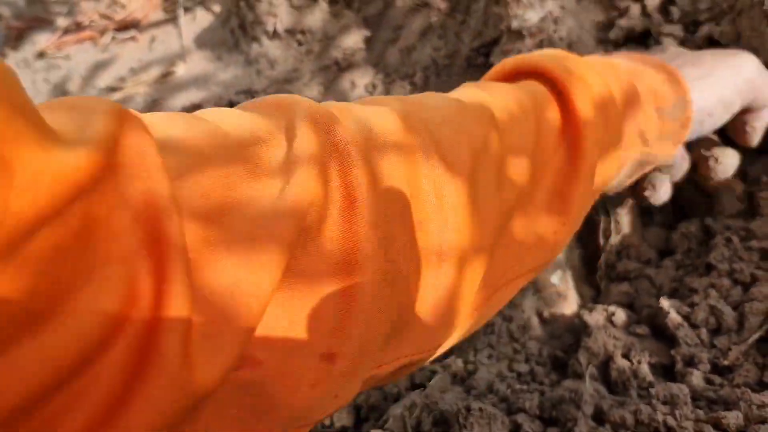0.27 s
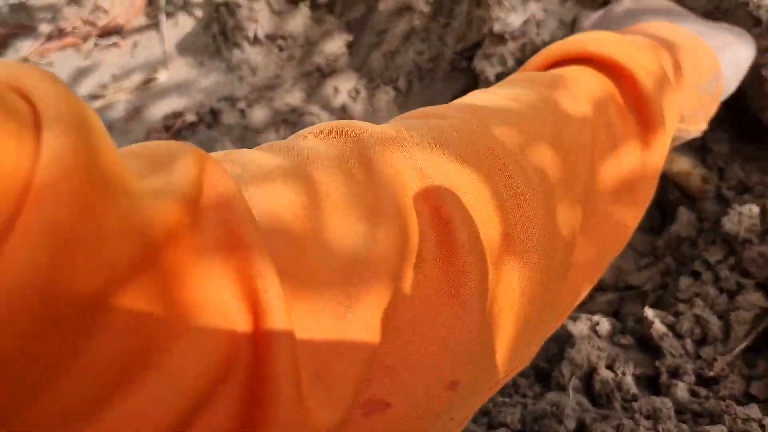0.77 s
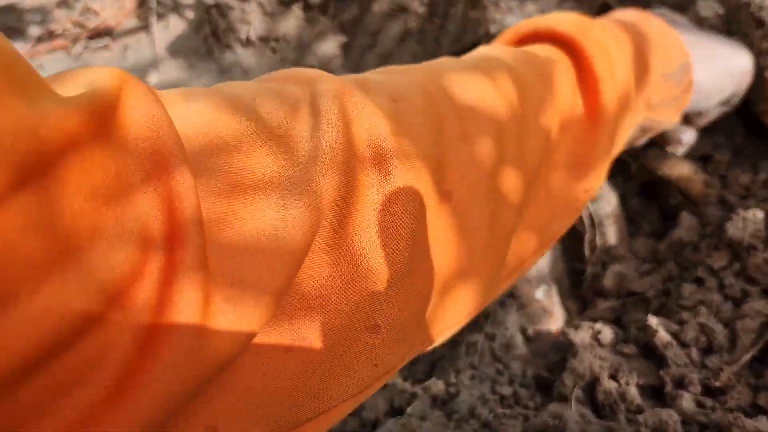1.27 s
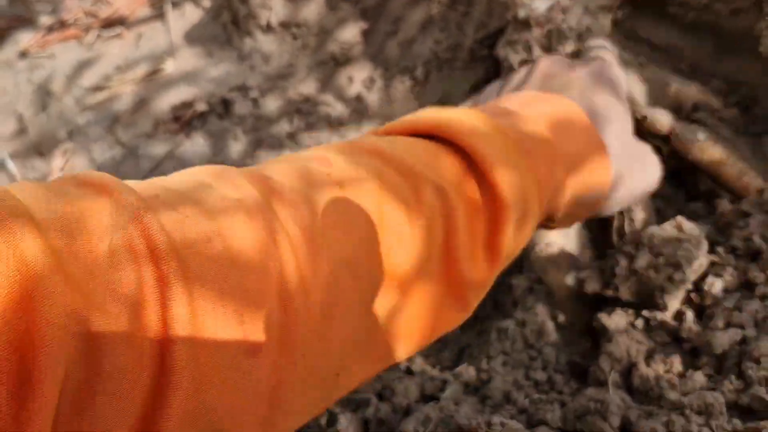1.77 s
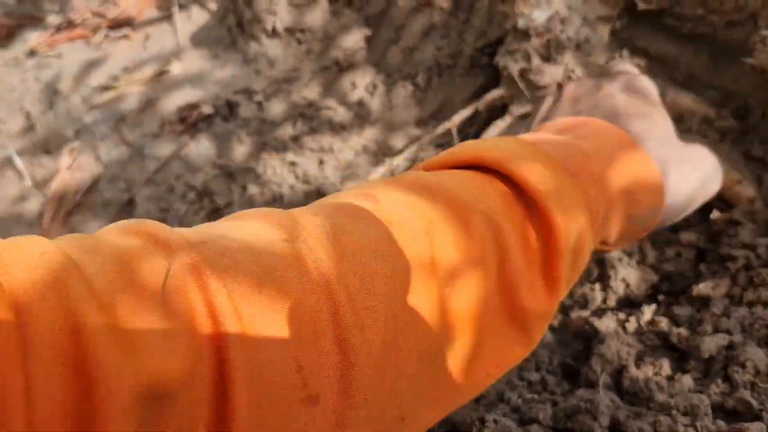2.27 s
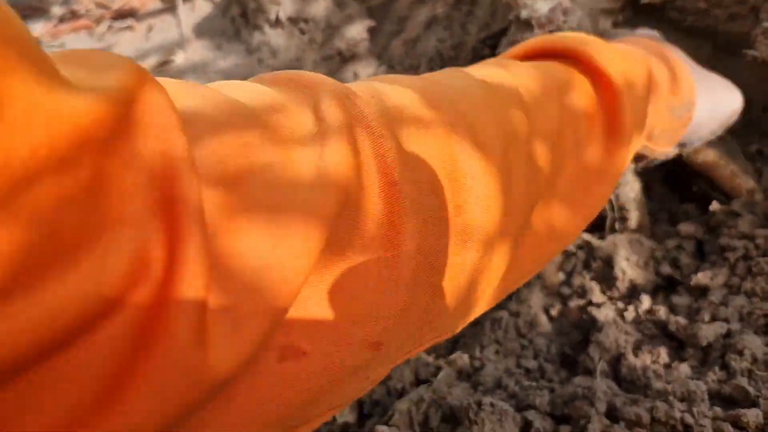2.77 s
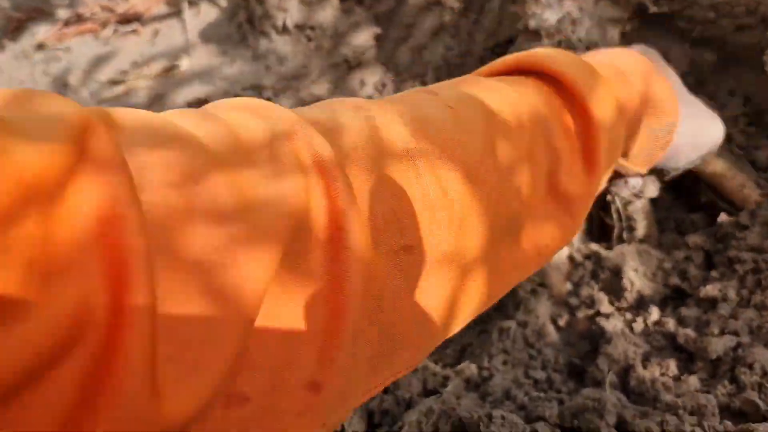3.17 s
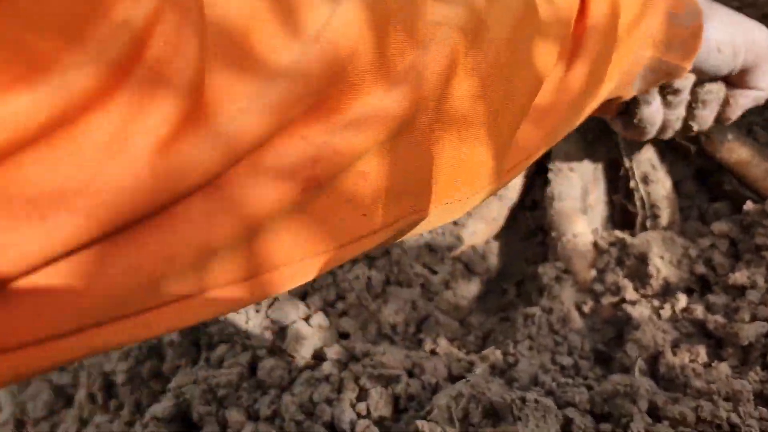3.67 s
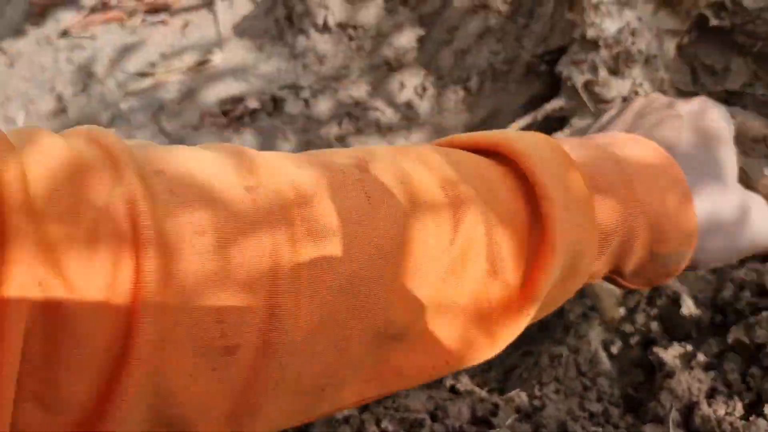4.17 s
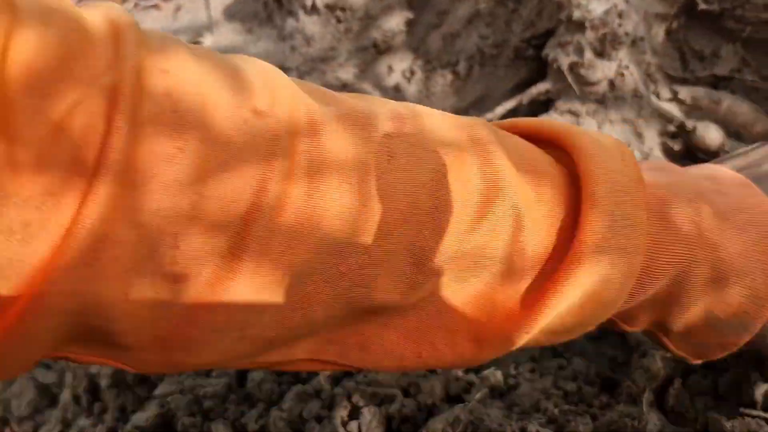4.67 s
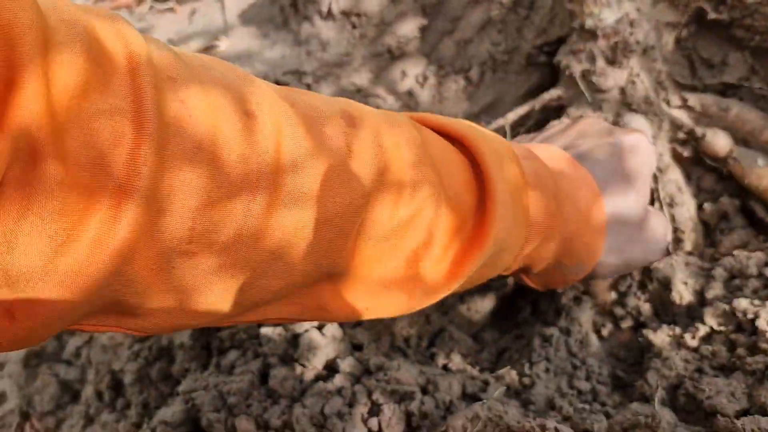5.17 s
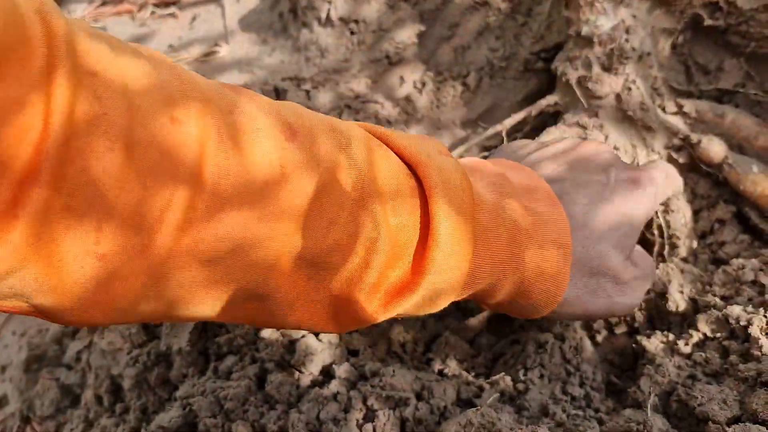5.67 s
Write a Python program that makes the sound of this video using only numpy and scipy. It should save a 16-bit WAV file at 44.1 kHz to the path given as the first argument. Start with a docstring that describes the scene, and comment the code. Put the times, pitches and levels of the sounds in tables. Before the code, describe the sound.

Irregular dry scratching and crumbling of earth close by, dotted with tiny clicks, above a low wavering motor hum across a field.

```python
"""A gloved hand scrapes crumbly soil from a plant base, right of a handheld phone: patchy noise and random grains
make grit and dust hiss, the sleeve swish, the glove drag and clods crumble, all following the hand's strokes.
Gliding narrow noise whistles in the rubbing; small stones and roots tick as short cracks over damped knocks.
Behind them a far engine drones across the field as three wavering tones, over a low rumble that swells
as the hand shoves earth, and a faint steady hiss."""
import sys
import numpy as np
from scipy import signal
from scipy.fft import rfft, irfft, next_fast_len
from scipy.io import wavfile
from scipy.ndimage import uniform_filter1d, map_coordinates

SR = 44100
rng = np.random.default_rng(int(sys.argv[2]) if len(sys.argv) > 2 else 0)


def digitize_waveform(pressure):
    """Quantize a signal to 16-bit integers and store it at the path in sys.argv[1].

    Rows of a 2-D input are taken as channels; values are limited to [-1, 1].
    """
    field = np.atleast_2d(pressure).T
    bounded = np.clip(field, -1, 1)
    quanta = np.round(bounded * 32767).astype(np.int16)
    wavfile.write(sys.argv[1], SR, quanta)


N = 260322


def amp(db):
    """Gain of a level in dB."""
    return 10 ** (np.asarray(db) / 20)


def unit(x):
    """Scaled to rms 1."""
    return x / np.sqrt(np.mean(x ** 2) + 1e-20)


def along(points, hz):
    """Value at each frequency, between (Hz, value) points on a log axis."""
    point_hz, values = np.transpose(points)
    return np.interp(np.log(hz + 1), np.log(point_hz + 1), values)


def curves(rows):
    """One value per sample for each column after the time."""
    time_s, *columns = np.transpose(sorted(map(tuple, rows)))
    return [np.interp(np.arange(N) / SR, time_s, column) for column in columns]


def wobble(rate):
    """A smooth random curve through normal draws, rate knots a second."""
    knots = rng.standard_normal(int(N * rate / SR) + 4)
    return map_coordinates(knots, [np.arange(N) * rate / SR])


def filtered(x, response):
    """x shaped by a complex response of frequency, padded so that little wraps round."""
    length = next_fast_len(x.shape[-1] + 8192)
    spectrum = rfft(x, length) * response(np.fft.rfftfreq(length, 1 / SR))
    return irfft(spectrum, length)[..., :N]


def ports(three, spectrum, alike, lag_s):
    """Stereo of rms 1: a shared part reaches the right port late by lag_s, two more belong to one port each."""
    # the phone's body shades the left port: hz, left_minus_right_db
    shadow = [(60, -5), (110, 4), (200, -4), (380, 3), (700, 0.5), (1290, 0), (2380, -4.0), (4400, -9.5),
              (8120, -4.5), (15000, -1.5)]
    side = np.array([[1], [-1]])  # left, right

    def share(hz):
        return np.clip(along(alike, hz), 0, 1)  # shared part of the power

    def colour(hz):
        return amp(along(spectrum, hz) + side * along(shadow, hz) / 2)

    def shared_response(hz):
        lag = np.exp(1j * np.pi * side * hz * lag_s)  # half the lag at either port
        return colour(hz) * np.sqrt(share(hz)) * lag

    both = filtered(three[[0, 0]], shared_response)
    own = filtered(three[1:], lambda hz: colour(hz) * np.sqrt(1 - share(hz)))
    return unit(both + own)


def patchy(depth_db):
    """Three noises that share one random gain over time and frequency, as nearby reflections add or cancel."""
    z = signal.stft(rng.standard_normal((3, N)), nperseg=256)[2]

    def smooth(bins, frames):
        across_hz = uniform_filter1d(rng.standard_normal(z.shape[1:]), bins, 0)
        return unit(uniform_filter1d(across_hz, frames, 1))

    patches = smooth(4, 12)
    lasting_bands = smooth(2, 70)  # narrow: where reflections add or cancel
    colour_shifts = smooth(10, 40)  # broad
    gain = amp(depth_db * (patches + 1.2 * lasting_bands + colour_shifts))
    return unit(signal.istft(z * gain, nperseg=256)[1][:, :N])


def crumbs(rate, spread_db):
    """Random breaking grains, rate a second on average, a few larger than the rest."""
    struck = rng.random(N) < rate / SR
    size = amp(spread_db * np.minimum(rng.exponential(size=N), 4))
    return unit(struck * size * rng.standard_normal((3, N)))


def shoves():
    """Gain of the low swells as the hand shoves earth, each a smooth rise and fall."""
    # swells: middle_s, length_s, peak_db
    swells = [(0.293, 0.086, -57), (0.404, 0.14, -57.5), (1.373, 0.3, -56), (2.104, 0.15, -56.5),
              (2.38, 0.05, -59), (2.5, .08, -57), (2.996, 0.32, -62), (4.29, 0.044, -51), (5.855, .12, -46)]
    t = np.arange(N) / SR
    gain = np.zeros(N)
    for middle_s, length_s, peak_db in swells:
        phase = np.pi * np.clip((t - middle_s) / length_s, -.5, .5)
        gain += amp(peak_db) * np.cos(phase) ** 2
    return gain


def field():
    """Wavering low rumble, nearly alike at both ports, its upper part with the shoves, and a faint steady hiss."""
    # low rumble: hz, relative_db_per_hz
    rumble_spectrum = [(15, -77), (25, -32), (32, -32), (40, -12.5), (52, 0), (62, -3), (78, -6.5),
                       (97, 0.5), (110, -7.5), (127, 4), (145, -18), (165, -7), (185, -12), (215, -11.5),
                       (260, -29), (330, -120)]
    # upper part of the rumble: hz, relative_db_per_hz
    upper_spectrum = [(170, -53), (215, -4.5), (260, -1), (320, -4), (370, -5), (430, -11), (520, -18.5),
                      (650, -41.5), (800, -49), (1100, -120)]
    # upper rumble without the shoves: time_s, level_db
    upper_level = [(0.0, -64.5), (0.43, -62), (0.61, -66.5), (3.37, -61.5), (3.75, -66), (4.26, -57),
                   (4.86, -63.5), (5.9, -64)]
    # steady hiss: hz, relative_db_per_hz
    hiss_spectrum = [(400, -20), (600, 0), (750, -12), (1300, -20), (3000, -26), (6700, -21), (8500, -27),
                     (15800, -27)]
    rumble = ports(rng.standard_normal((3, N)), rumble_spectrum, [(40, 0.96), (150, 1.0)], lag_s=0.00024)
    upper = ports(patchy(0.85), upper_spectrum, [(250, 0.87), (500, 0.86)], lag_s=0.000069)
    hiss = ports(patchy(0.78), hiss_spectrum, [(500, 0.24), (1500, 0.78), (5000, 0.18)], lag_s=.0001)
    rumble_gain = amp(-47.5 + 1.2 * wobble(4.7))
    upper_gain = np.hypot(amp(curves(upper_level)[0]), shoves())  # added in power
    return rumble_gain * rumble + upper_gain * upper + amp(-77) * hiss


def engine():
    """Firing orders one to three as sines; the path through the air makes the tones flutter in level and phase."""
    # third order: time_s, pitch_hz, rms_level_db (before flutter and stereo balance)
    third_order = [(0.0, 202.3, -46), (0.06, 199.8, -42.5), (0.85, 199.9, -56.5), (1.44, 199.9, -55.5),
                   (2.14, 200.0, -49.5), (2.19, 200.0, -57), (2.76, 199.8, -44), (3.5, 199.9, -47.5),
                   (3.84, 200.0, -41.5), (4.06, 200.0, -45), (4.09, 200.3, -41.5), (4.19, 201.5, -45.5),
                   (4.73, 201.3, -37.5), (5.01, 201.7, -38.5), (5.11, 202.5, -43), (5.9, 204.0, -46.5)]
    # first order, the lowest tone: time_s, rms_level_db (before flutter and stereo balance)
    first_order = [(0.0, -33), (0.05, -44.5), (0.38, -59), (0.49, -47), (1.18, -48), (1.25, -61),
                   (1.31, -52), (1.77, -48.5), (1.92, -61), (2.07, -40), (2.28, -70), (2.36, -46.5),
                   (3.12, -49.5), (3.24, -40), (3.32, -70), (3.4, -42), (3.68, -54), (3.75, -41),
                   (3.96, -62), (4.06, -45.5), (5.04, -46.5), (5.16, -56), (5.29, -44), (5.9, -55.5)]
    third_hz, third_db = curves(third_order)
    first_db, = curves(first_order)
    turn = 2 * np.pi * np.cumsum(third_hz / 3) / SR  # phase of the first order
    lead = np.array([[1], [-1]])  # left, right: offsets in phase (rad) and level (dB)
    first_gain = amp(first_db + 0.33 * wobble(12)) * amp(-.4 * lead)
    first = first_gain * np.sin(turn + .5 * wobble(6.1) + 0.052 * lead)
    second_gain = amp(-63.5 + 4.7 * wobble(5.4))
    second = second_gain * np.sin(2 * turn + 1.2 * wobble(7) + 0.18 * lead)
    third_gain = amp(third_db + .7 * wobble(12)) * amp(.7 * lead)
    third = third_gain * np.sin(3 * turn + .15 * wobble(9) + .15 * lead)
    return np.sqrt(2) * (first + second + third)  # sine peak from rms level


def ticks():
    """Stones and roots: each tick is a short bright crack over a damped low knock."""
    # ticks: start_s, crack_db and knock_db (before the lifts below), knock_hz, left_minus_right_db
    hits = [(0.2929, -42, -62, 700, -6), (0.6876, -44, -67, 939, -11), (0.7304, -44, -72, 1480, -8),
            (0.751, -63, -58, 900, -5), (0.8367, -46, -83, 674, -13), (2.0844, -46, -44, 840, -7),
            (2.1119, -52, -59, 710, -12), (2.2353, -68, -82, 665, -9.5), (2.264, -66, -80, 673, -10),
            (2.4793, -52, -62, 870, 9), (2.7789, -63, -61, 846, -9), (2.8194, -50.5, -66, 840, -7.0),
            (3.182, -70, -60, 715, -2), (3.8642, -42, -72, 800, -13), (4.4584, -57, -51.5, 740, -6),
            (4.971, -81, -70, 690, -7), (5.2965, -70, -61, 830, 3), (5.519, -68, -69, 700, 16),
            (5.773, -76, -64, 610, 8), (5.8167, -58, -46.5, 645, 4), (5.8476, -40, -44, 656, 4),
            (5.8874, -43, -60, 830, 13)]
    crack_lift_db, knock_lift_db = 4, 6.0
    out = np.zeros((2, N + SR))
    t = np.arange(SR // 40) / SR

    def bright(hz):
        highpass = 1j * hz / (900 + 1j * hz)
        return highpass / (1 + 1j * hz / 5500) ** 3

    for start_s, crack_db, knock_db, knock_hz, pan_db in hits:
        noise = rng.standard_normal((3, len(t)))
        noise[0, 0] = 5  # the first break is one sharp step
        crack = filtered(noise[0] + 0.3 * noise[1:], bright)[:, :len(t)]
        crack = amp(crack_db + crack_lift_db) * crack * amp(-60 * t / .006)  # falls 60 dB in 6 ms
        ring = np.sin(2 * np.pi * knock_hz * t)
        swell_and_decay = amp(-60 * t / 0.02) * (1 - np.exp(-t / 0.00084))
        knock = amp(knock_db + knock_lift_db) * ring * swell_and_decay
        start = round(start_s * SR)
        pan = amp(np.array([[.5], [-.5]]) * pan_db)
        out[:, start:start + len(t)] += pan * (crack + knock)
    return out[:, :N]


def whistles():
    """Narrow whistling colours in the rubbing: noise around a gliding centre, swelling and fading."""
    # whistles: start_s, end_s, start_hz, end_hz, width_hz, level_db (of the random part), left_minus_right_db
    glides = [(0.328, 0.424, 1295, 1430, 202, -70.5, -8), (0.405, 0.45, 1475, 1510, 300, -67, -8),
              (0.749, 0.772, 2480, 2400, 120, -61, -6), (1.732, 1.778, 705, 700, 59.5, -75, 4),
              (1.988, 2.412, 4850, 4580, 259, -69.5, 0), (2.142, 2.34, 5450, 5430, 253, -72.5, 1),
              (2.88, 3.297, 2260, 2310, 347, -81.5, -9), (3.062, 3.15, 1350, 1420, 201, -76, -6),
              (4.926, 4.96, 6840, 6800, 200, -87, -10), (5.298, 5.4, 6800, 6660, 300, -81, 1),
              (5.674, 5.717, 6700, 6700, 300, -80, -4), (3.382, 3.433, 2440, 2265, 25, -74, -12),
              (3.565, 3.896, 2180, 2160, 442, -66.5, 2), (4.073, 4.34, 1355, 1397, 395, -78, -15),
              (4.092, 4.356, 2350, 2163, 501, -79, -24)]
    out = np.zeros((2, N))
    for start_s, end_s, start_hz, end_hz, width_hz, level_db, pan_db in glides:
        start, n = round(start_s * SR), round((end_s - start_s) * SR)
        knots = rng.standard_normal((2, 600))
        # two random curves give random amplitude and phase
        re, im = (map_coordinates(k, [np.arange(n) * width_hz / SR]) for k in knots)
        re = re + 40 / width_hz  # the narrower, the steadier
        turn = 2 * np.pi * np.cumsum(np.linspace(start_hz, end_hz, n)) / SR
        turn = turn + np.array([[0], [1.5]])  # right port 1.5 rad ahead
        tone = re * np.cos(turn) + im * np.sin(turn)
        gain = amp(level_db + np.array([[.5], [-.5]]) * pan_db)
        out[:, start:start + n] += gain * signal.windows.tukey(n, .3) * tone
    return out


def strokes():
    """Gain of each layer: every stroke lands, swells to its peak, eases and lifts; overlaps add in power."""
    # strokes of the hand: start_s, rise_s, fall_s, entry_below_peak_db, exit_below_peak_db,
    # then peak levels: grit_db, dust_db, sleeve_db, clods_db, glove_db
    moves = [ (0.0, 0.026, 0.12, 2, -4.5, -64.5, -64.5, -80, -89, -92),
             (0.08, 0.067, 0.046, 20, 3.5, -50.5, -50.5, -55.5, -80, -71),
             (0.19, 0.069, 0.23, 4.5, 12.5, -63.5, -61, -63.5, -65.5, -65),
             (0.552, 0.035, 0.028, 7, 8, -62, -59.5, -84, -85, -94),
             (0.6, 0.048, 0.044, 3, 0, -60.5, -65, -63.5, -82, -78),
             (0.7, 0.07, .29, 3, 5.5, -63.5, -66.5, -63.5, -68.5, -64),
             (1.069, 0.043, 0.027, 3, 3.5, -61.5, -64, -63.5, -61, -58.5),
             (1.14, 0.086, 0.11, -0.5, -0.5, -71.5, -72, -67.5, -73.5, -69.5),
             (1.27, 0.093, 0.061, 12, 4.5, -60, -59.5, -56.5, -57, -60.5),
             (1.43, 0.045, 0.16, 4.5, 16, -58.5, -58.5, -57.5, -65.5, -61),
             (1.55, 0.18, 0.17, 8, 4.5, -71, -74, -63, -84, -67),
             (1.777, .007, 0.045, 2, 10, -63.5, -62, -62, -86, -73),
             (1.85, .13, 0.076, 13.5, 1, -56.5, -54.5, -66, -96, -84),
             (2.05, 0.053, 0.014, 12.5, 3.5, -49, -45.5, -52.5, -56.5, -68),
             (2.12, 0.12, .105, 1, 6, -70, -71.5, -68.5, -79.5, -75),
             (2.338, .017, 0.15, 5, 1.5, -62.5, -62, -65.5, -87, -86),
             (2.45, .03, 0.018, 19, 10.5, -52, -48, -51.5, -56.5, -63),
             (2.485, 0.023, 0.01, 12, 11, -55, -44, -72, -71, -74),
             (2.52, 0.036, 0.12, -1, 8, -77, -76, -77.5, -76.5, -78),
             (2.672, 0.0076, 0.047, 4, 3, -63.5, -59, -78, -86, -91),
             (2.715, 0.023, .13, 4, 5, -60, -60, -65.5, -74.5, -71.5),
             (2.881, 0.085, 0.009, 19.5, 3, -49, -48.5, -57.5, -60.5, -64.5),
             (2.98, 0.072, 0.12, 0, 5, -69.5, -70.5, -70, -73, -71.5),
             (3.18, 0.011, 0.029, -2, -1, -63, -64.5, -68, -82, -86),
             (3.205, 0.024, .05, 7, 11, -63.5, -63, -68, -77, -82),
             (3.26, 0.068, 0.062, 7, 2, -65, -66, -70.5, -74, -77),
             (3.4, 0.096, 0.077, 5, 9, -63, -64, -63, -68.5, -65),
             (3.575, 0.1, 0.053, 7.5, 3.5, -55.5, -56.5, -60.5, -65, -62.5),
             (3.72, 0.062, 0.048, 2.5, 3, -54, -53.5, -65, -63, -67),
             (3.8, 0.045, 0.037, 14, 4, -60, -67, -60, -62, -66),
             (3.86, 0.099, 0.12, 4.5, 3, -67.5, -66, -68, -72.5, -67.5),
             (4.07, 0.052, 0.236, 4, 2.5, -68, -73, -61, -79.5, -65),
             (4.26, 0.051, 0.044, 4.5, -0.5, -72, -66, -76, -85, -76),
             (4.36, 0.047, 0.046, 8.5, 5, -59.5, -57.5, -58.5, -72.5, -61.5),
             (4.43, 0.019, 0.022, 6, 3, -77, -74, -58.5, -59, -72),
             (4.454, 0.064, 0.015, 2, 6, -59.5, -58, -62, -68, -64),
             (4.52, .08, .24, 2, 8, -66, -65, -65, -76, -67),
             (4.99, 0.034, .11, -0.5, 1.5, -73.5, -69.5, -77.5, -84, -88),
             (4.97, 0.0053, 0.01, -2, 8, -65.5, -60, -88, -76, -82),
             (5.138, 0.029, 0.057, -0.5, 6, -58, -57, -64, -95, -87),
             (5.23, .035, .013, 14.5, 19, -47, -45.5, -47.5, -66.5, -70),
             (5.284, 0.01, 0.079, -2, 11, -76, -69.5, -75.5, -77, -77),
             (5.434, 0.05, 0.023, 6, 4, -65, -56, -68.5, -72, -75.5),
             (5.518, 0.011, 0.0069, 0, 13, -66, -53, -64.5, -74, -87),
             (5.541, .004, 0.0099, 3, 11.5, -65, -51, -64, -68, -80),
             (5.55, 0.015, 0.068, 1, 6, -61.5, -57, -66.5, -76.5, -77),
             (5.769, 0.0045, 0.021, 9, 7, -68.5, -60.5, -92, -88, -98),
             (5.81, 0.05, 0.053, 3.5, 8, -49.5, -47, -54, -60.5, -55.5), ]
    # loose soil settling under and between strokes: grit_db, dust_db, sleeve_db, clods_db, glove_db
    rest_db = [-86, -83, -92, -93, -90]
    touch_share, lift_share = .3, .45  # contact made and lost, as shares of rise and fall
    edge_db = 25  # level drop at either edge
    t = np.arange(N) / SR
    power = np.outer(amp(rest_db) ** 2, np.ones(N))
    for start_s, rise_s, fall_s, entry_db, exit_db, *peak_db in moves:
        touch_s, lift_s = touch_share * rise_s, lift_share * fall_s
        times = np.cumsum([start_s - touch_s, touch_s, rise_s, fall_s, lift_s])
        span = slice(*np.searchsorted(t, times[[0, -1]]))
        levels_db = [-entry_db - edge_db, -entry_db, 0, -exit_db, -exit_db - edge_db]
        shape_db = np.interp(t[span], times, levels_db)
        power[:, span] += amp(np.add.outer(peak_db, shape_db)) ** 2
    return np.sqrt(power)


def hand():
    """Sliding grit and dust, rubbing cloth, breaking clods and the dragging glove follow each stroke."""
    # sliding grit: hz, relative_db_per_hz
    grit_spectrum = [(1470, -15.5), (2500, -12), (2760, -11.5), (3240, -7), (3920, -1.5), (4630, -11),
                     (5140, -4.5), (7070, 0), (8600, -1.5), (9100, -4), (12100, -40), (20500, -120)]
    # dust, the finest grains: hz, relative_db_per_hz
    dust_spectrum = [(5470, -18), (8600, -5), (9700, -1.5), (10500, 1.5), (11800, 6), (13000, 5),
                     (14900, 3.5), (16000, 0)]
    # rubbing sleeve: hz, relative_db_per_hz
    sleeve_spectrum = [(1500, -120), (2500, -40), (3400, -16), (4100, -11), (4400, -3), (4900, 0),
                       (5300, -5), (5700, -4), (6050, -30), (6500, -17), (8000, -40), (12000, -120)]
    # breaking clods: hz, relative_db_per_hz
    clods_spectrum = [(250, -8), (400, -8.5), (520, -16), (670, 0.5), (850, 0.5), (1100, -1.5),
                      (1400, -4.5), (1800, -5.5), (2600, -15), (4000, -120)]
    # dragging glove: hz, relative_db_per_hz
    glove_spectrum = [(500, -120), (900, -57), (1400, -9), (1800, -12), (2300, -6), (2800, -9), (3400, -9),
                      (4200, -18.5), (6000, -82), (9000, -120)]
    grit_gain, dust_gain, sleeve_gain, clods_gain, glove_gain = strokes()
    grit_grains = patchy(1.5) + 0.6 * crumbs(3000, 2.3)
    dust_grains = patchy(1.3) + 0.4 * crumbs(3500, 3)
    clod_grains = patchy(1.26) + 0.33 * crumbs(300, 2.0)
    glove_grains = patchy(1.6) + 0.4 * crumbs(820, 1.5)
    # negative lags: the hand is on the right, so the right port hears it first
    grit = ports(grit_grains, grit_spectrum, [(2000, 0.19), (9000, 0.16)], lag_s=-0.000266)
    dust = ports(dust_grains, dust_spectrum, [(9000, 0.2)], lag_s=-0.000279)
    sleeve = ports(patchy(0.83), sleeve_spectrum, [(2000, 0.09), (6000, 0.15)], lag_s=-0.00031)
    clods = ports(clod_grains, clods_spectrum, [(400, 0.44), (1500, 0.97)], lag_s=-0.000066)
    glove = ports(glove_grains, glove_spectrum, [(1500, 0.077), (4000, 0.6)], lag_s=-0.00034)
    crumbling = amp(2.7 * wobble(70))  # uneven breaking
    soil = grit_gain * grit + dust_gain * dust + clods_gain * crumbling * clods + glove_gain * glove
    slips = amp(0.6 * wobble(45))  # the fingers stick and slip
    return slips * soil + sleeve_gain * sleeve


def scene():
    """Everything that reaches the two ports."""
    return field() + engine() + ticks() + whistles() + hand()


def record(dry):
    """The phone keeps nothing above its band limit of 15850 Hz."""
    return filtered(dry, lambda hz: hz < 15850)


dry = scene()
out = record(dry)
digitize_waveform(out)
```